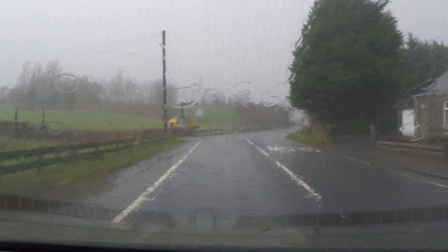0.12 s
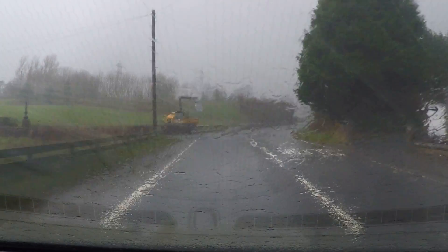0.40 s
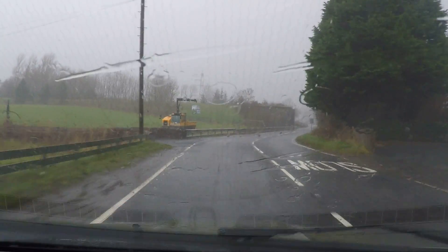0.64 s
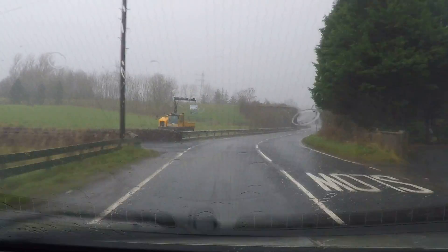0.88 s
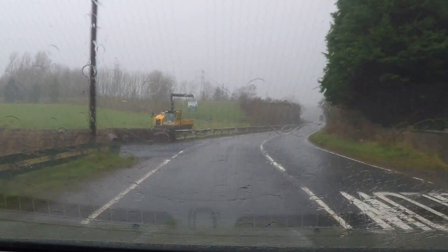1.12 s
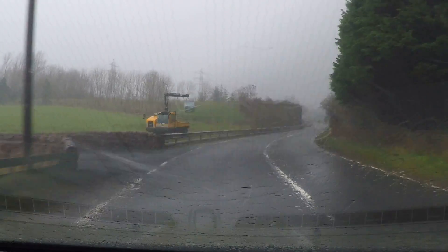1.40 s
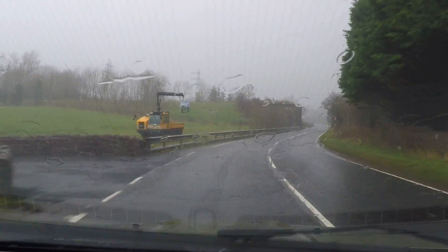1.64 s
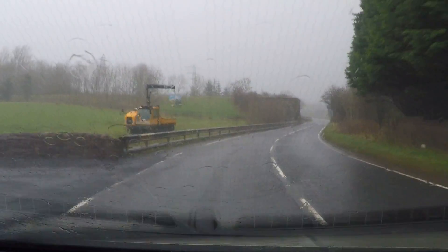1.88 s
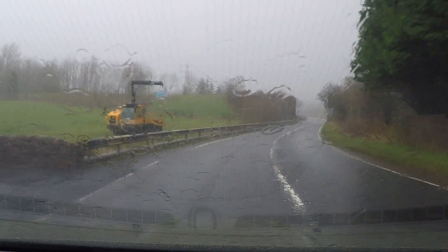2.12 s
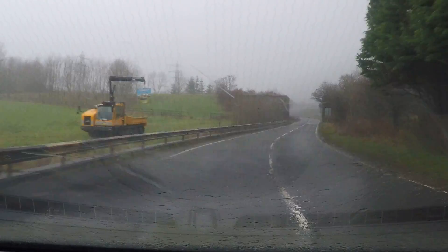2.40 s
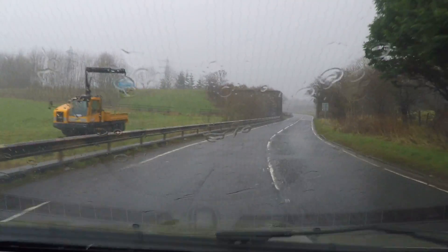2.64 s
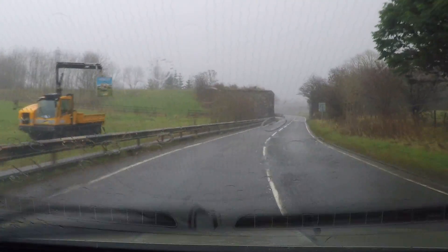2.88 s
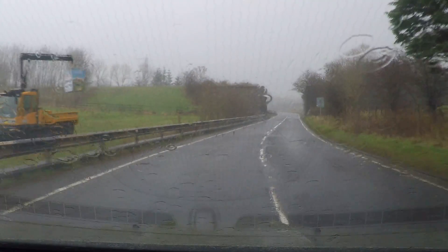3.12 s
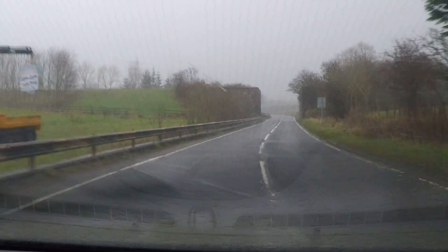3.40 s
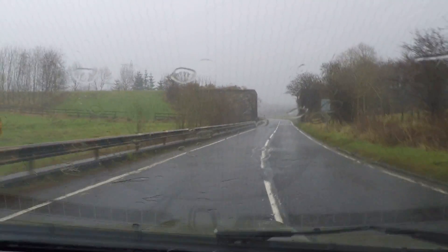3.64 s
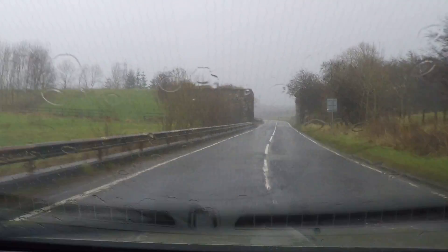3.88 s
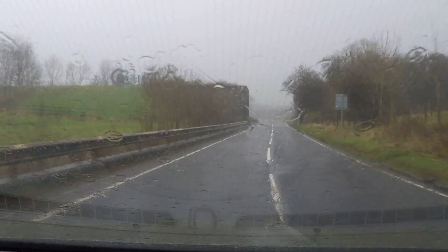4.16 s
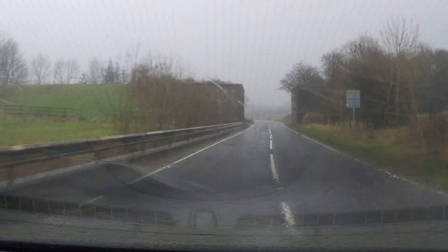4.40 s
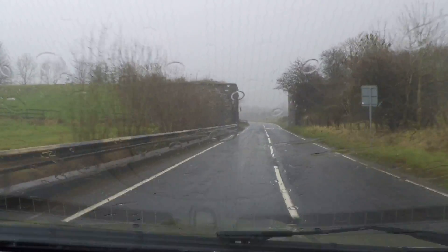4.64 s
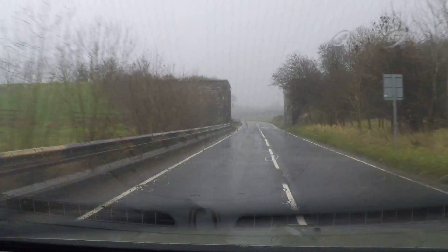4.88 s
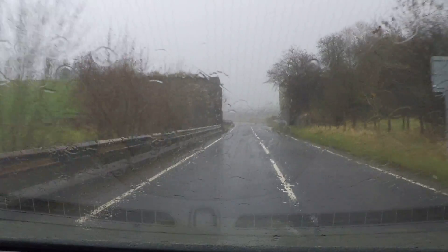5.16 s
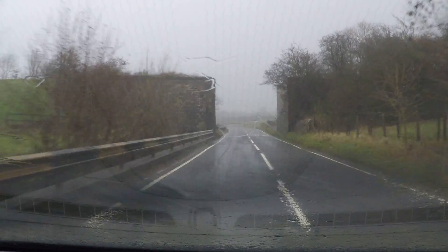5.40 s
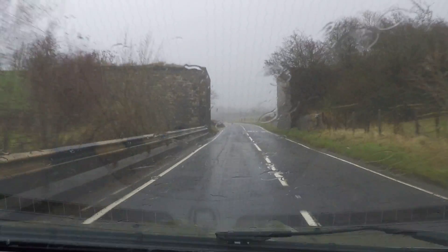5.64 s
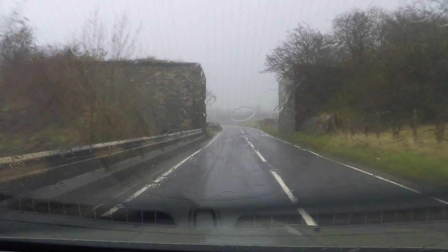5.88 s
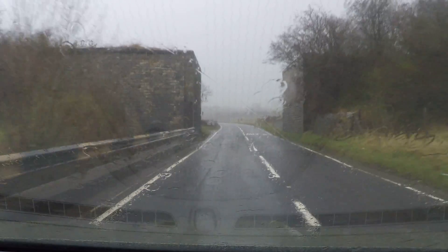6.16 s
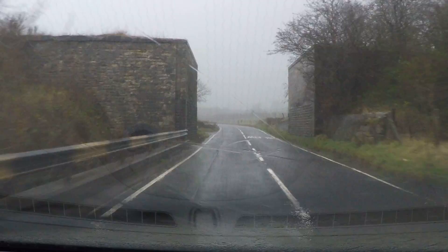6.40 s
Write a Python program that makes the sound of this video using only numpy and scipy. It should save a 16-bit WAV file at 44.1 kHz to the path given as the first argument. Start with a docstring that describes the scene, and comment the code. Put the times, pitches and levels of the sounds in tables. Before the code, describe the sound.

Heard from a small camera microphone on the dashboard of a car driving through heavy rain. A deep, uneven road rumble booms in the closed cabin. Fine rain patters in flurries, with bigger drops tapping the windscreen, over smooth wind and spray hiss. Wipers thud softly about once a second. A faint squeak wavers past the middle, and a tiny treble rustle grows towards the end.

```python
"""Wet road, heavy rain

Inside a moving car, heard by one small camera microphone at the dashboard. Tyres and engine make the
cabin boom: noise through low body modes. Drops patter on the windscreen: clicks and noise ring the glass.
Shaped noise makes the hiss of spray and wind outside; soft blows make big drops and the wipers' thuds.
Tiny ticks rustle high in the treble, from something small in the trim; once a faint gliding squeak wavers."""
import sys
import numpy as np
from scipy import signal
from scipy.fft import rfft, irfft
from scipy.io import wavfile
from scipy.ndimage import uniform_filter1d

SR = 44100
rng = np.random.default_rng(int(sys.argv[2]) if len(sys.argv) > 2 else 0)


def natural_amplitude(level_db):
    """Convert a level in decibels to a linear amplitude factor, elementwise."""
    exponent = np.asarray(level_db, float) / 20
    return 10 ** exponent


def put_to_file(sound):
    """Save the sound as 16-bit audio at rate SR, in the file named by the first command-line argument."""
    columns = np.atleast_2d(sound).T  # one column per channel
    safe = np.clip(columns, -1, 1)
    whole_steps = np.round(safe * 32767)
    wavfile.write(sys.argv[1], SR, whole_steps.astype(np.int16))


N = 287532    # samples


def rms_one(x):
    """Scale to rms 1."""
    return x / np.sqrt(np.mean(x ** 2) + 1e-20)


def in_time(rows):
    """Curve columns after the first (seconds), as one value a sample."""
    s, *columns = np.transpose(rows)
    return [np.interp(np.arange(N) / SR, s, column) for column in columns]


def swells(rows, half_s):
    """Bell-shaped rises of a level, in dB; each has fallen to 1/e of its rise half_s from its centre."""
    t = np.arange(N) / SR
    return sum(db * np.exp(-((t - s) / half_s) ** 2) for s, db in rows)


def drift(rate):
    """Slow chance of spread 1 that changes about rate times a second."""
    knots = rng.standard_normal(N // 40 + 2002)    # one knot every 40 samples
    r = np.exp(-80 * np.pi * rate / SR)
    slow = signal.lfilter([1], [1, -2 * r, r * r], knots)[2000:]
    return np.interp(np.arange(N) / 40, np.arange(len(slow)), rms_one(slow))


def resonance(x, hz, width_hz):
    """One resonance with gain 1 on top."""
    r = np.exp(-np.pi * width_hz / SR)
    feed = np.array([1, 0, -1]) * (1 - r * r) / 2
    return signal.lfilter(feed, [1, -2 * r * np.cos(2 * np.pi * hz / SR), r * r], x)


def steep_resonance(x, hz, width_hz):
    """The same resonance twice in a row, for steeper skirts."""
    return resonance(resonance(x, hz, width_hz), hz, width_hz)


def body(x, modes):
    """Modes in parallel, signs alternating."""
    return sum((-1) ** k * natural_amplitude(db) * resonance(x, hz, width) for k, (hz, width, db) in enumerate(modes))


def softened(x, low_hz, high_hz):
    """A light, soft contact: a click without its lows and highs."""
    return signal.sosfilt(signal.butter(2, [low_hz, high_hz], "band", fs=SR, output="sos"), x)


def clicks(per_s, spread_db):
    """Random clicks, many small and few large."""
    sizes = natural_amplitude(spread_db * np.minimum(rng.exponential(1, N), 3.5)) * rng.choice([-1, 1], N)
    return sizes * (rng.random(N) < per_s / SR) + 1e-18


def blows(events, modes, scatter_db, band_hz, splash_s):
    """A soft hit and two weaker after-touches each; every mode is struck with a strength of its own."""
    s, level_db = np.transpose(events)
    unit = np.abs(softened(body(np.eye(1, 2000)[0], modes), *band_hz)).max()    # peak of one plain hit
    chance = rng.standard_normal((len(s), len(modes)))
    later = rng.random((len(s), 2))
    first_touch_s = s + splash_s * (.3 + later[:, 0])
    second_touch_s = s + splash_s * (1.5 + 3.0 * later[:, 1])
    out = 0
    for k, (hz, width, db) in enumerate(modes):
        hits = np.full(N, 1e-18)
        strength = natural_amplitude(level_db + db + scatter_db * chance[:, k]) / unit
        hits[(s * SR).astype(int)] = strength
        hits[(first_touch_s * SR).astype(int)] -= 0.12 * strength
        hits[(second_touch_s * SR).astype(int)] += 0.1 * strength
        out = out + (-1) ** k * resonance(hits, hz, width)
    return softened(out, *band_hz)


def rumble(modes, level_db, even_s):
    """Road roughness through steep body modes; its swells follow the given level."""
    run_in = SR // 2
    rough = rng.standard_normal((2, N + run_in))    # neighbouring modes are shaken by unrelated noise
    shaken = sum(natural_amplitude(db) * steep_resonance(rough[k % 2], hz, 1.226 * width)
                 for k, (hz, width, db) in enumerate(modes))[run_in:]
    window = int(even_s * SR)
    swell = np.sqrt(uniform_filter1d(uniform_filter1d(shaken ** 2, window), window))
    gain = uniform_filter1d(natural_amplitude(level_db) / swell, int(.06 * SR))    # a heavy body cannot swell abruptly
    return gain * shaken


# The deepest shake of the car body. Each row: time in seconds, level in dB.
SHAKE_LEVEL = [(0, -16.5), (1, -18), (2.1, -20), (2.7, -17), (3.8, -16.5), (4.6, -15), (5.3, -18.5),
               (6.52, -21)]
# Its modes. Each row: frequency in Hz, width in Hz before the rumble widens it, relative level in dB.
SHAKE_MODES = [(27, 3.5, 1), (35, 10, -7), (44, 8, -6), (52, 8, -6)]


def body_shake():
    """The road shakes the heavy car body in its lowest modes."""
    return rumble(SHAKE_MODES, *in_time(SHAKE_LEVEL), even_s=0.33)


# Cabin boom from the road surface. Each row: time in seconds, level in dB before the swells.
BOOM_LEVEL = [(0, -22), (.5, -19), (1.1, -18), (1.65, -20.5), (2.3, -17), (2.9, -17), (3.5, -17),
              (4.1, -16), (4.6, -18), (5.3, -19), (5.8, -14), (6.2, -18), (6.52, -19.5)]
# Brief swells of the boom, as rough noise has by chance. Each row: centre in seconds, rise in dB.
BOOM_SWELLS = [(.76, 6.5), (1.26, 6.5), (3.25, 9.5), (3.94, 2.5), (4.36, 6.5), (6.42, 10.5)]
# Modes of the cabin. Each row: frequency in Hz, width in Hz before the rumble widens it, relative level in dB.
BOOM_MODES = [(83, 10, -1), (97, 10, 0), (108, 10, -2), (124, 10, -7)]


def cabin_boom():
    """The road surface makes the cabin boom, with brief chance swells."""
    level_db, = in_time(BOOM_LEVEL)
    return rumble(BOOM_MODES, level_db + swells(BOOM_SWELLS, half_s=0.027), even_s=0.098)


# Jolts lift the panel drone. Each row: centre in seconds, rise in dB.
PANEL_SWELLS = [(.52, 7), (.76, 6), (1.2, 8), (1.77, 15.5), (3.4, 9), (3.67, 6.5), (4.36, 6.5), (5.21, 8),
                (6.28, 12.5)]
# Modes of the panels. Each row: frequency in Hz, width in Hz before the rumble widens it, relative level in dB.
PANEL_MODES = [(162, 11, 0), (184, 9, -19), (199, 9, -19), (213, 7, -18)]


def panel_drone():
    """Body panels drone above the boom, from a steady -37.5 dB that jolts lift."""
    return rumble(PANEL_MODES, -37.5 + swells(PANEL_SWELLS, half_s=0.038), even_s=0.13)


# Rain on the glass. Each row: time in seconds, level in dB before a trim of the patter.
RAIN = [(0, -38), (.2, -36), (.4, -39), (.7, -38.5), (1.05, -41), (1.35, -38.5), (2.06, -37.5), (2.55, -41),
        (2.78, -39), (3.05, -40.5), (3.3, -37), (3.5, -41), (4.04, -43), (4.27, -37.5), (4.65, -39.5),
        (5.0, -43), (5.2, -37), (5.55, -40), (5.78, -38), (6.08, -38), (6.19, -48.5), (6.33, -33),
        (6.52, -40.5)]
# Ring of windscreen and dashboard. Each row: frequency in Hz, width in Hz, relative level in dB.
GLASS_MODES = [(478, 76, -2.5), (614, 61, -14.5), (848, 180, -5), (985, 227, -3), (1278, 79, -6.5),
               (1592, 160, -3), (1824, 271, -2), (2188, 98, -3.5), (2587, 59, -9), (2800, 268, -12),
               (3106, 695, -13), (4256, 300, -15.5), (5590, 310, -21)]


def patter():
    """Small drops come in flurries, over a sheet of fine spray; all ring the glass."""
    rain_db, = in_time(RAIN)
    drops_per_s = 500 * natural_amplitude(1.5 * drift(18))
    drops = rms_one(softened(clicks(drops_per_s, spread_db=4.0), 800, 3500))
    spray = rng.standard_normal(N) * natural_amplitude(0.76 * drift(30))
    sheet = drops + natural_amplitude(1) * spray
    return natural_amplitude(rain_db - 0.8) * rms_one(body(sheet, GLASS_MODES))


# Colour of wind and spray. Each row: frequency in Hz, relative level in dB per Hz.
HISS_COLOUR = [(150, -12), (250, -0.5), (330, -4), (400, -13.5), (500, -3.5), (700, -11.5), (1400, -7.5),
               (2400, -11.5), (5000, -20), (7000, -27.5), (9000, -36), (12000, -37), (13500, -40),
               (15200, -51.5)]


def hiss():
    """Smooth wind and spray noise around -47 dB, rising a little with the rain."""
    rain_db, = in_time(RAIN)
    hz = np.maximum(np.fft.rfftfreq(N, 1 / SR), 1)
    colour_hz, colour_db = np.transpose(HISS_COLOUR)
    colour = natural_amplitude(np.interp(np.log(hz), np.log(colour_hz), colour_db, left=-60))
    noise = rms_one(irfft(rfft(rng.standard_normal(N)) * colour, N))
    swell_db = .45 * (rain_db - rain_db.mean())
    return natural_amplitude(-47 + swell_db + 1.1 * drift(3.3)) * noise


# The high rustle. Each row: time in seconds, level in dB before the throb and the puffs.
RUSTLE_LEVEL = [(0, -77), (1.0, -74), (1.2, -70), (2.0, -75.5), (2.8, -73.5), (3.4, -72), (3.8, -68.5),
                (4.4, -62.5), (5.0, -63.5), (5.5, -60), (6.52, -59)]
# Puffs added to it. Each row: centre in seconds, level in dB, half width in seconds (to 1/e).
RUSTLE_PUFFS = [(.61, -60, 0.017), (.7, -67, 0.018), (1.41, -68, 0.027), (2.131, -49.5, 0.039),
                (2.31, -65.5, .05), (3.35, -65, .03), (3.5, -65, 0.037), (3.59, -64, 0.017),
                (3.999, -67, .015), (4.32, -64.5, 0.013)]
# Its little modes. Each row: frequency in Hz, width in Hz before widening by half, mean relative level in dB.
RUSTLE_MODES = [(8760, 130, -10), (9370, 130, -6), (9620, 110, -4), (9850, 110, -7), (10680, 260, -4),
                (10950, 260, 0), (11350, 450, -2.5), (11750, 400, -6), (12300, 300, -11)]
# From here the rustle throbs: quick rise, slow sag.
THROB_FROM_S, THROB_EVERY_S, THROB_RISE_S, THROB_SAG_DB = 3.885, .2305, .03, 7.5


def rustle():
    """Dense tiny ticks into bright little modes that come and go each in its own time."""
    t = np.arange(N) / SR
    level_db, = in_time(RUSTLE_LEVEL)
    since = np.maximum(t - THROB_FROM_S, 0) % THROB_EVERY_S
    sag = np.interp(since, [0, THROB_RISE_S, THROB_EVERY_S], [1, 0, 1])
    sag_db = THROB_SAG_DB * sag * (t > THROB_FROM_S)
    puffs = sum(natural_amplitude(db) * np.exp(-((t - s) / half_s) ** 2) for s, db, half_s in RUSTLE_PUFFS)
    ticks = clicks(4000 * natural_amplitude(2.0 * drift(14)), spread_db=1.9)
    rung = sum(natural_amplitude(db + 1.5 * drift(5)) * steep_resonance(ticks, hz, 1.5 * width)
               for hz, width, db in RUSTLE_MODES)
    return (natural_amplitude(level_db - sag_db) + puffs) * rms_one(rung)


# Big drops on the windscreen. Each row: time in seconds, peak in dB before the scatter of the modes.
BIG_DROPS = [(0.16, -21), (0.19, -19), (0.212, -18), (0.49, -22), (0.574, -22), (0.913, -25), (1.169, -21),
             (1.199, -22), (1.237, -21), (1.319, -21), (1.486, -16), (1.829, -23), (2.097, -23),
             (2.768, -19), (3.215, -15), (3.229, -20), (3.348, -16), (3.407, -24), (3.654, -24),
             (3.781, -21), (3.9, -27), (4.168, -23), (4.645, -21), (4.668, -21), (5.091, -22), (5.318, -15),
             (5.452, -20), (5.487, -25), (5.548, -22), (5.665, -22), (5.761, -21), (5.911, -25),
             (6.111, -24), (6.295, -23), (6.38, -21), (6.409, -18), (6.446, -17), (6.465, -22)]


def big_drops():
    """Single heavy drops strike the glass and splash just after."""
    return blows(BIG_DROPS, GLASS_MODES, scatter_db=1.5, band_hz=(950, 2900), splash_s=.0015)


# Turns of the wipers. Each row: time in seconds, peak in dB before the scatter of the modes.
WIPER_TURNS = [(.746, -31), (1.75, -29.5), (2.733, -32), (3.731, -29.5), (4.728, -34), (5.72, -32.5)]
# Modes of the thud. Each row: frequency in Hz, width in Hz, relative level in dB before the scatter.
WIPER_MODES = [(165, 40, 0), (260, 70, 0), (340, 70, -2), (490, 100, -5)]


def wipers():
    """The wipers thud at each turn: soft blows on low, quickly damped modes."""
    return blows(WIPER_TURNS, WIPER_MODES, scatter_db=1.0, band_hz=(80, 700), splash_s=.004)


# A faint squeak. Each row: time in seconds, pitch in Hz before the flutter, level in dB before the break-up.
SQUEAK = [(3.48, 3500, -75), (3.53, 3490, -60), (3.6, 3480, -70), (3.655, 3490, -56), (3.73, 3410, -64),
          (3.78, 3530, -56), (3.84, 3500, -55), (3.9, 3350, -68), (3.96, 3430, -58), (4.0, 3320, -57),
          (4.04, 3270, -75)]


def squeak():
    """One thin gliding sine that flutters in pitch and breaks up in level."""
    hz, level_db = in_time(SQUEAK)
    t = np.arange(N) / SR
    on = (t > SQUEAK[0][0]) & (t < SQUEAK[-1][0])
    flutter_hz = 45 * drift(30)
    phase = 2 * np.pi * np.cumsum(hz + flutter_hz) / SR
    return on * np.sqrt(2) * natural_amplitude(level_db + 2.5 * drift(25)) * np.sin(phase)


def scene():
    """All sources at one microphone."""
    road = body_shake() + cabin_boom() + panel_drone()
    rain = patter() + hiss()
    return (road + rain + rustle() + big_drops() + wipers() + squeak())[None, :]


def top_cut(x):
    """Nothing passes above the cut-off."""
    return signal.sosfilt(signal.butter(12, 15150, fs=SR, output="sos"), x)


def record(dry):
    """The finished mix as the small camera microphone delivers it."""
    return top_cut(dry)


dry = scene()
out = record(dry)
put_to_file(out)
```